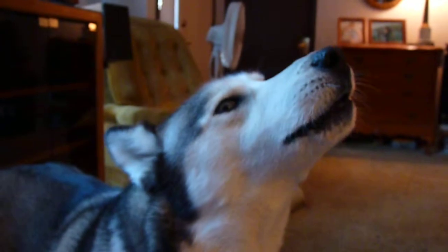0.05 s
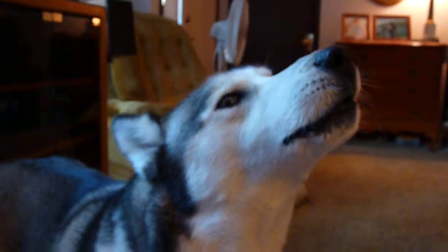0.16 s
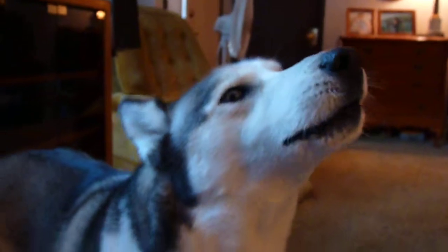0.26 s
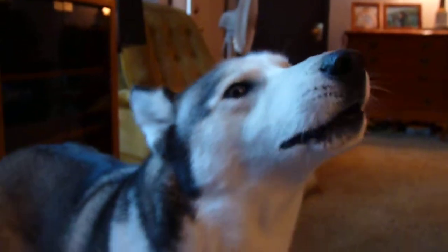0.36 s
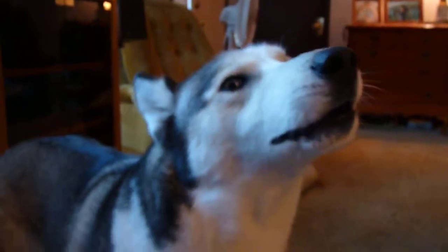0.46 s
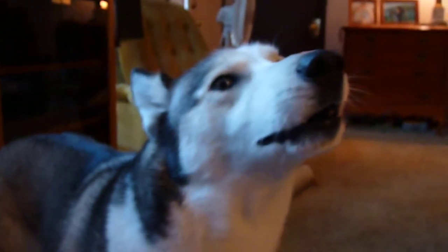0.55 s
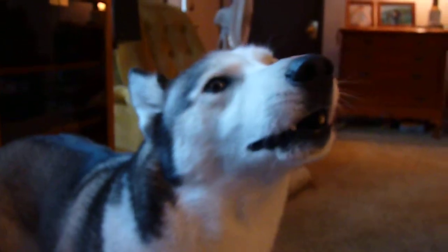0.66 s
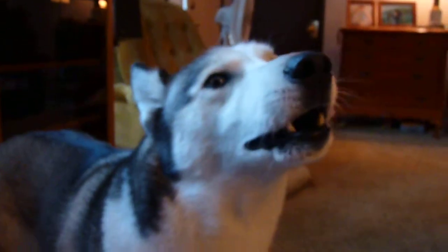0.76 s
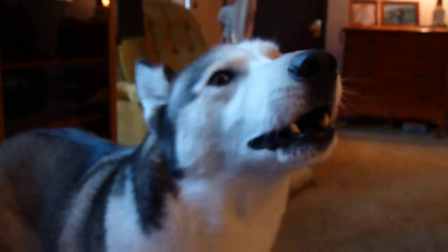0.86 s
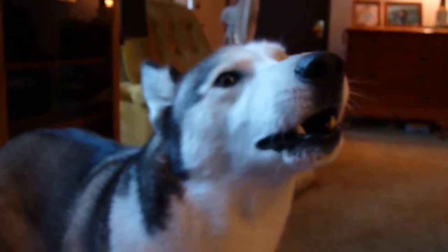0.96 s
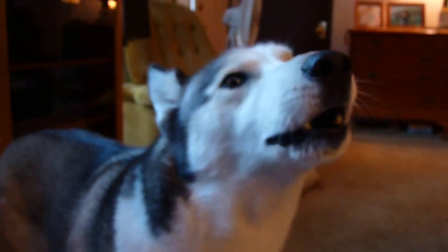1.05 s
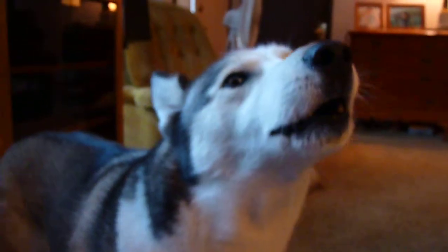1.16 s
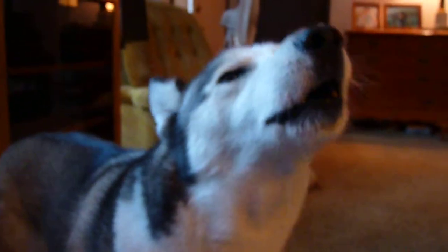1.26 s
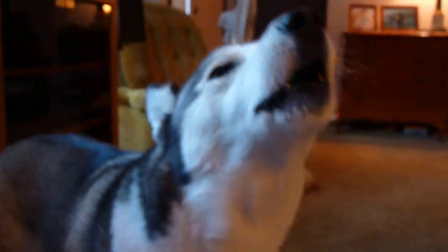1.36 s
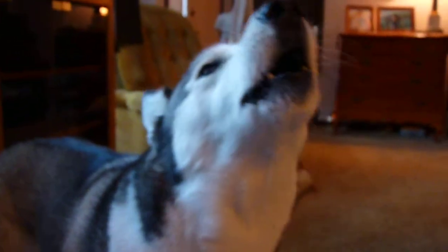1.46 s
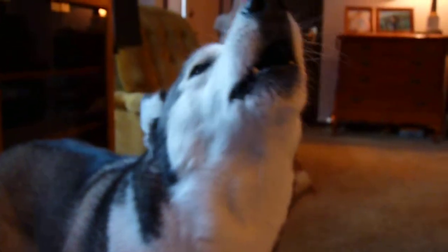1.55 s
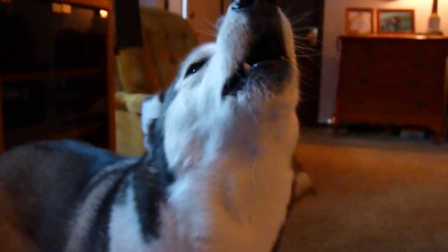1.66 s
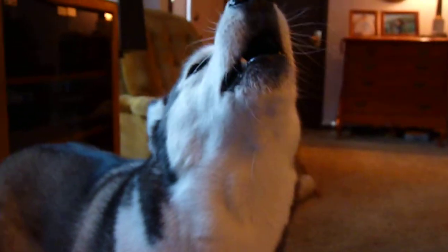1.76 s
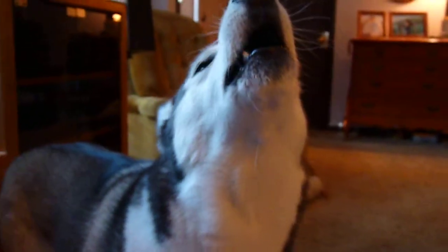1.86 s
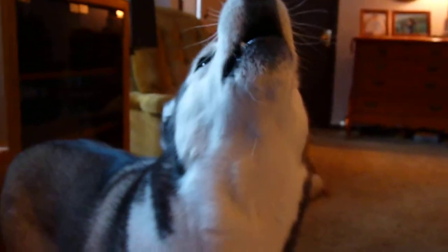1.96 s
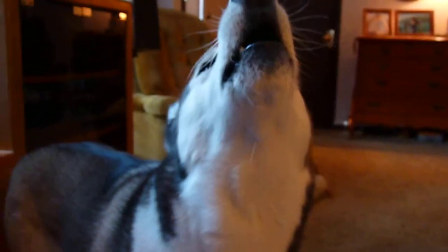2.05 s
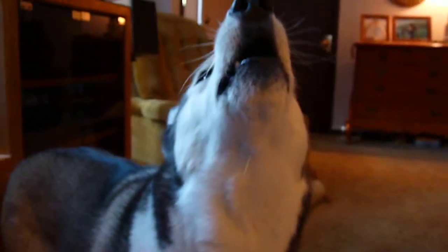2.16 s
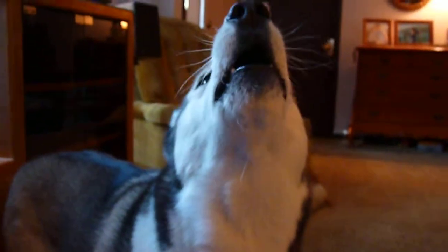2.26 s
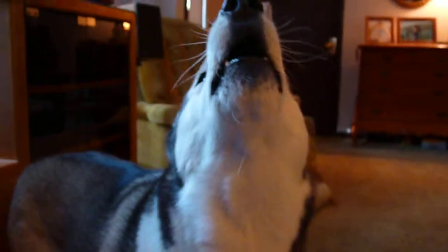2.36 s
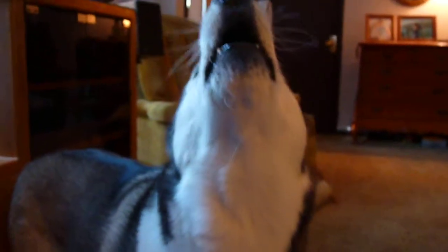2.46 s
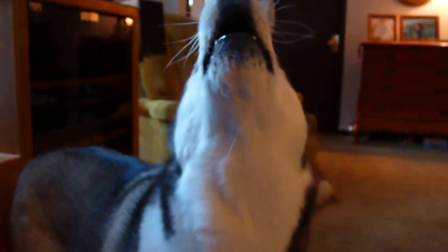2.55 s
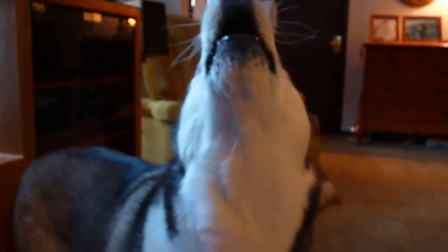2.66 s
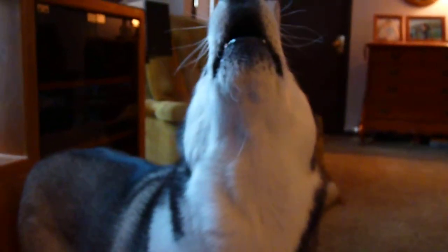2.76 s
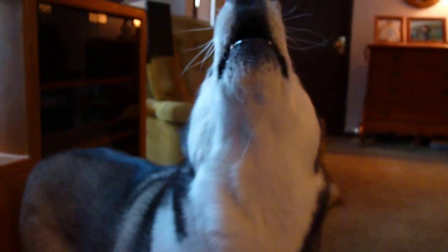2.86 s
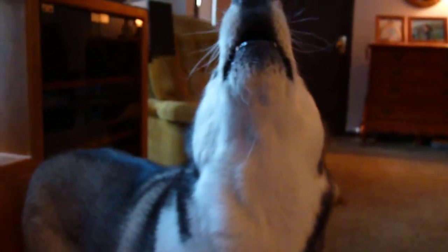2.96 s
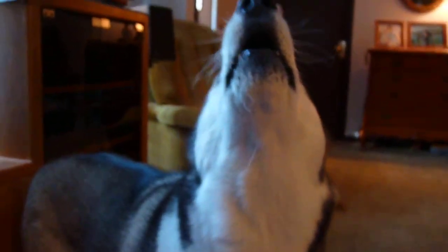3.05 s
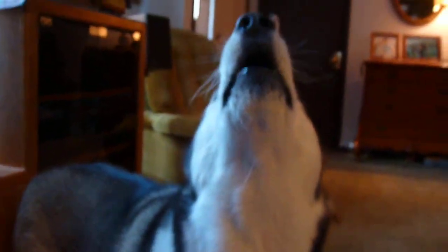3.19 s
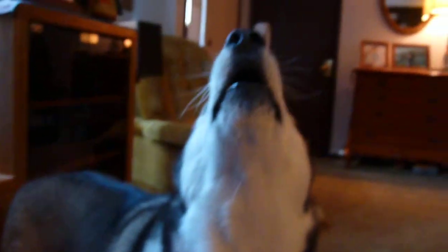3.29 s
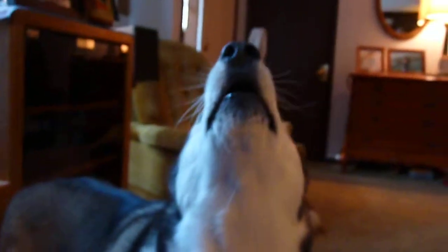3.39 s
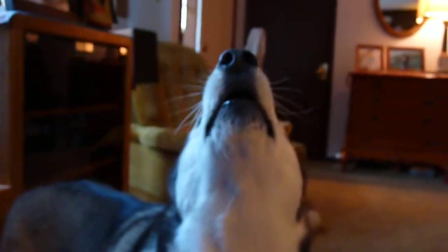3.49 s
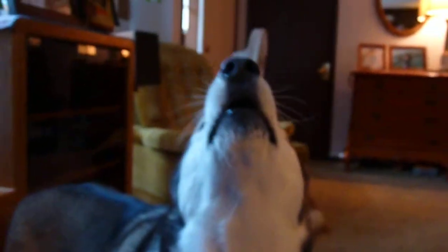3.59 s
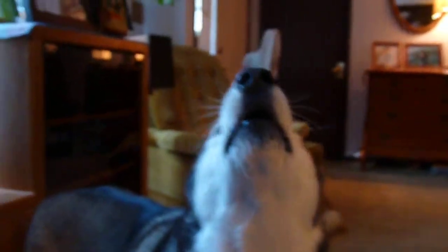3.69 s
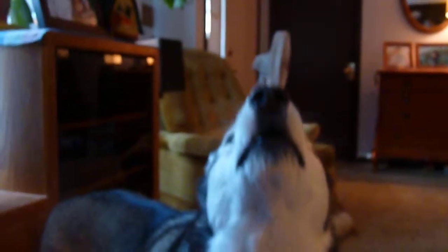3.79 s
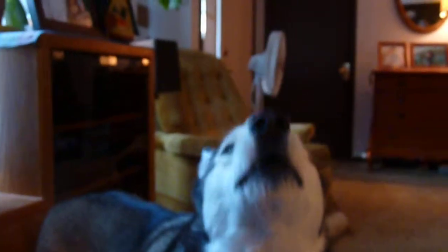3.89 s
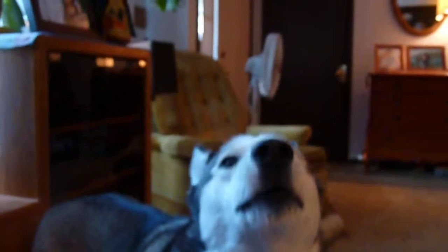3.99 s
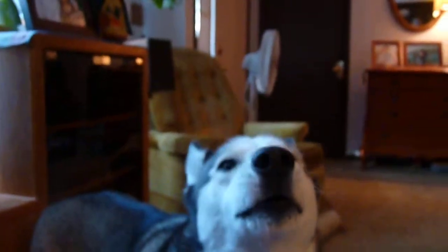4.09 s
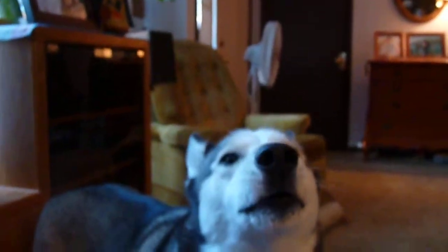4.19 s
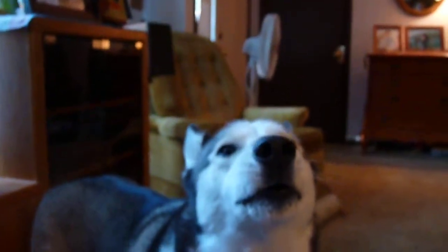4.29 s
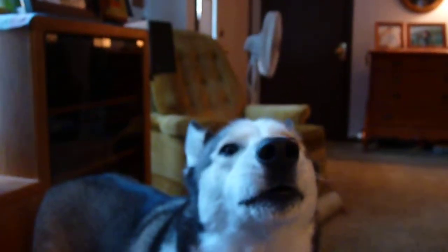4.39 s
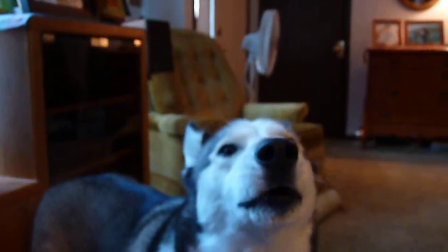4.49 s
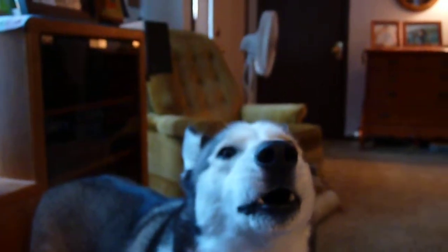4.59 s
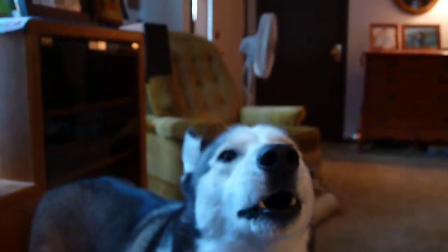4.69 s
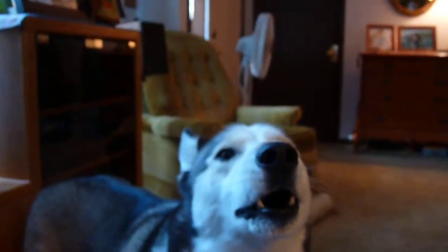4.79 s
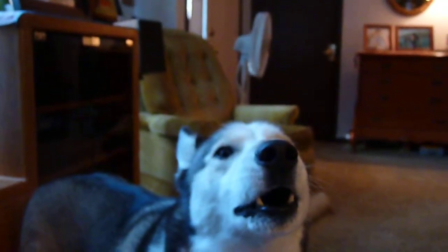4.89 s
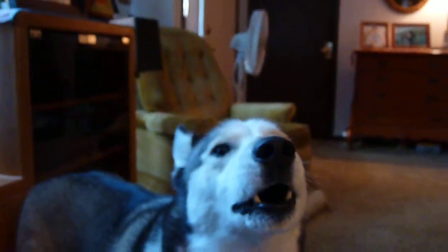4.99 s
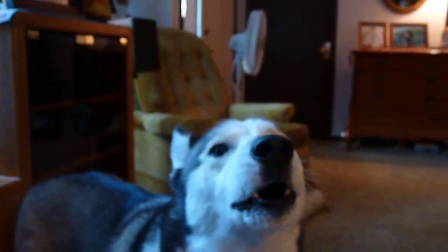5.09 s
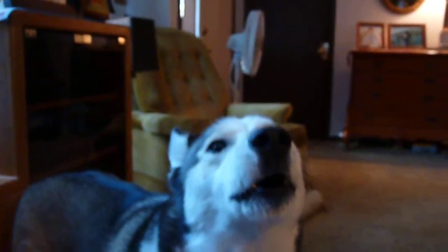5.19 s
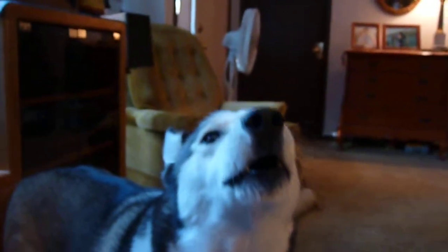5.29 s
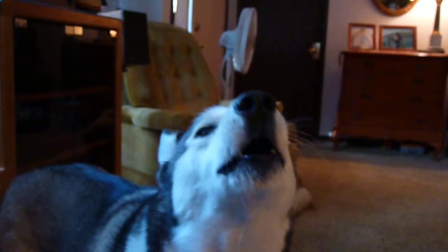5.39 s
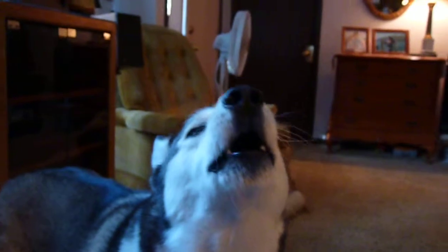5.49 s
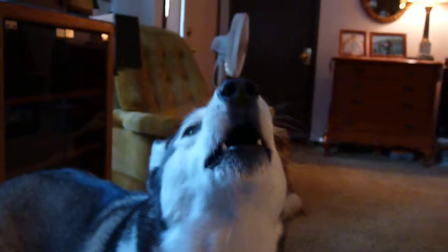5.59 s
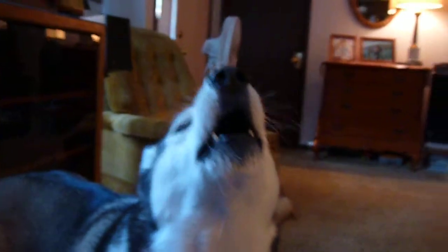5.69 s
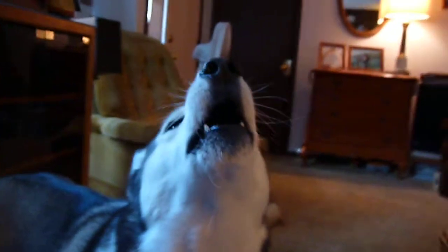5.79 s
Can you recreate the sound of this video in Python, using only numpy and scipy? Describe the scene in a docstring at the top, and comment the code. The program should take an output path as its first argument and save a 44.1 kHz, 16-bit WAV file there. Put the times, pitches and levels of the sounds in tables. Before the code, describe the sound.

A large dog close by mutters wavering syllables and holds long howls indoors, while a second dog yips and whines faintly farther off.

```python
"""A large dog close to a small camera mouths short syllables, then holds long howls, in a carpeted living room.
Its voice is summed overtones shaped by jaw, mouth and throat resonances, with breath noise pulsing each cycle.
A second dog, further off, yips and whines in arching overtones and huffs in bursts of coloured noise.
Under them lie coloured room and microphone noise, a low rumble, a faint steady tone and puffs of air."""
import sys
import numpy as np
from scipy import signal
from scipy.fft import rfft, irfft, next_fast_len
from scipy.io import wavfile
from scipy.ndimage import uniform_filter1d, map_coordinates

SR = 44100
rng = np.random.default_rng(int(sys.argv[2]) if len(sys.argv) > 2 else 0)


def persist_wave(psi):
    """Save psi, clipped to +-1, as 16-bit WAV."""
    counts = np.round(np.clip(psi, -1, 1) * 32767).astype(np.int16)
    wavfile.write(sys.argv[1], SR, np.atleast_2d(counts).T)


def ratio(d):
    """dB to gain"""
    e = np.asarray(d, float) / 20
    return 10 ** e


N = 257544
TIME = np.arange(N) / SR


def unit(x):
    """Scale to rms 1."""
    return x / np.sqrt(np.mean(x ** 2) + 1e-20)


def along(points, hz):
    """Read (frequency [Hz], value) points on a log frequency axis."""
    f, v = np.transpose(points)
    return np.interp(np.log(hz + 1), np.log(f + 1), v)


def curve(rows):
    """Read a (time [s], value) table at every sample."""
    return np.interp(TIME, *np.transpose(rows))


def wobble(knots_per_s):
    """Smooth random curve through normally distributed knots."""
    knots = rng.standard_normal(int(N * knots_per_s / SR) + 4)
    return map_coordinates(knots, [np.arange(N) * knots_per_s / SR])


def noise(spectrum):
    """Noise of rms 1, coloured by (frequency [Hz], relative level [dB]) points."""
    m = next_fast_len(N + 8192)
    white = rfft(rng.standard_normal(m))
    colour = ratio(along(spectrum, np.fft.rfftfreq(m, 1 / SR)))
    return unit(irfft(white * colour, m)[:N])


def bursts(rows):
    """Summed envelopes of (time [s], length [s], level [dB]) that rise fast and die away."""
    total = 0
    for start_s, length_s, db in rows:
        age = np.maximum(TIME - start_s, 0) / length_s
        total = total + ratio(db) * np.tanh(25 * age) * np.exp(-3 * age * age)
    return total


def dips(rows):
    """Summed bell curves of (time [s], half-length [s], depth)."""
    return sum(depth * np.exp(-((TIME - s) / half_s) ** 2) for s, half_s, depth in rows)


def hump(hz, centre_hz, width_hz, steep):
    """Gain of a resonance, 1 at its centre."""
    return (1 + ((hz - centre_hz) / width_hz) ** 2) ** -steep


def phrase(rows, fade_s):
    """Sample span, soft edges and interpolated columns of one call."""
    s, *cols = np.transpose(rows)
    span = slice(max(round((s[0] - fade_s / 2) * SR), 0), round((s[-1] + fade_s / 2) * SR))
    t = TIME[span]
    edge = np.sin(np.pi / 2 * np.clip(np.minimum(t - t[0], t[-1] - t) / fade_s, 0, 1))
    return span, edge, [np.interp(t, s, c) for c in cols]


# room and microphone noise: (frequency [Hz], relative level [dB])
QUIET_COLOUR = [(20, -34), (60, -26.5), (120, -18), (200, -14), (240, -1), (600, -0.5), (1050, -11.5),
                (1500, -14), (2300, -17.5), (4000, -21), (7000, -21.5), (8200, -28), (9000, -54.5)]
# low rumble: (time [s], mean level [dB])
RUMBLE_LEVEL = [(0.05, -65), (0.85, -65), (1.19, -78), (3.8, -66), (4.82, -66), (5.11, -82.5), (5.8, -79)]
# breath hitting the microphone: (time [s], length [s], level [dB])
MIC_PUFFS = [(.85, 0.064, -58), (.94, 0.034, -53), (1.92, 0.047, -57), (4.8, 0.072, -57)]


def background():
    """Steady coloured noise, an uneven low rumble, a faint thin electronic tone and low puffs of air."""
    hum = ratio(-58 + 0.2 * wobble(1.9)) * noise(QUIET_COLOUR)
    whistle = ratio(-83) * np.sin(2 * np.pi * 6665 * TIME)
    puffs = bursts(MIC_PUFFS) * noise([(15, -10), (35, -11), (110, -13.5), (250, -35.5), (1000, -77.5)])
    rumble_colour = [(15, -20), (40, -16.5), (85, -12.5), (125, -2), (170, -4.5), (260, -29), (600, -81)]
    rumble = ratio(curve(RUMBLE_LEVEL) + 4.3 * wobble(8.3)) * noise(rumble_colour)
    return hum + whistle + puffs + rumble


# decay of the room: (frequency [Hz], t60 [s])
ROOM_T60 = [(200, 0.15), (1500, 0.36), (6000, 0.017)]


def room(x):
    """Short furnished-room tail: noise in which each frequency dies at its own speed."""
    hz, t, z = signal.stft(rng.standard_normal(SR // 2), SR, nperseg=256)
    t60_s = np.maximum(along(ROOM_T60, hz), .03)
    tail = signal.istft(z * ratio(-60 * t / t60_s[:, None]), SR, nperseg=256)[1]
    delayed = np.pad(x, (300, 0))  # samples
    return signal.fftconvolve(delayed, tail / np.linalg.norm(tail))[:N]


# voiceless breaths of the far dog: (time [s], length [s], centre [Hz], level [dB])
HUFF_BREATHS = [(3.611, 0.22, 1600, -55), (4.088, 0.07, 703, -63), (4.507, 0.19, 554, -69)]


def far_huffs():
    """Turbulent breath: noise bursts peaking at one frequency each."""
    out = np.zeros(N)
    for s, length_s, hz, db in HUFF_BREATHS:
        colour = [(.2 * hz, -30), (.78 * hz, -8), (hz, 0), (hz, -12), (2 * hz, -26), (9000, -60)]
        out += bursts([(s, length_s, db)]) * noise(colour)
    return out


# yips, the last trailing off in a whimper: (time [s], pitch [Hz], level before throat [dB])
YIP_CALLS = [
    [(.185, 524, -59.5), (.214, 597.5, -45), (.25, 678, -38.5), (.275, 681, -40), (.302, 673, -39.5),
     (.356, 603, -42), (.42, 557, -51.5), (.46, 454, -61.5)],
    [(.694, 526, -55.5), (.73, 593, -49.5), (.768, 607.4, -42.5), (.81, 599, -47), (.86, 583, -52),
     (.93, 563, -58)],
    [(1.81, 584, -61), (1.86, 565.3, -57.5), (1.908, 760, -37), (1.938, 801.6, -37.5),
     (1.968, 816.6, -36.5), (2.025, 759, -42.5), (2.075, 550, -58)],
    [(4.262, 560.5, -49), (4.278, 597.4, -45), (4.305, 655.5, -43), (4.33, 667.6, -45), (4.357, 652, -48.5),
     (4.372, 648, -45), (4.436, 636.8, -45.5), (4.525, 617.2, -45), (4.563, 597.6, -49.5), (4.62, 588, -49),
     (4.69, 577.7, -46.5), (4.75, 592.3, -49.5), (4.8, 587.2, -49.5), (4.88, 579, -46.5),
     (4.97, 567.4, -51), (5.051, 599, -57), (5.23, 620, -54.5), (5.391, 563, -67.5), (5.48, 603, -62),
     (5.6, 516, -73.5)],
]
# throat of the far dog: (frequency [Hz], gain [dB])
FAR_THROAT = [(900, 2.5), (1180, 12.5), (1350, 8), (1550, 0), (2000, -4), (2400, -2), (2750, 1.5),
              (3280, -3.5), (3550, -11.5), (3900, -18), (4200, -29), (6000, -31), (7500, -45.5)]
# brightness of the yips: (time [s], gain per overtone above the second [dB])
YIP_SHINE = [(.19, 0), (.3, -1), (.45, 0), (1.95, 0), (4.27, -1.5), (4.31, .6), (4.51, 0.5), (4.56, 0),
             (4.8, -1.5), (4.9, -3.5), (5.2, 0)]


def far_yips():
    """Thin high voice: a weak fundamental under throat-shaped overtones of flickering loudness."""
    out = np.zeros(N)
    waver, flicker = 1 + .002 * wobble(60), ratio(2 * wobble(45))
    shine = curve(YIP_SHINE)
    for rows in YIP_CALLS:
        span, edge, (hz, level_db) = phrase(rows, fade_s=.004)
        hz = uniform_filter1d(hz, size=SR // 50, mode="nearest")  # the pitch glides round its turns
        turn = 2 * np.pi * np.cumsum(hz * waver[span]) / SR
        squeal_db = -.14 * np.maximum(hz - 690, 0)  # odd overtones fade in the highest register
        gains_db = [squeal_db - 11.5]
        for k in range(2, 12):
            gains_db.append(along(FAR_THROAT, k * hz) + squeal_db * (k % 2) + (k - 2) * shine[span])
        for k, db in enumerate(gains_db, 1):
            level = ratio(level_db + db + 2.2 * wobble(25)[span])
            out[span] += np.sqrt(2) * edge * level * np.sin(k * turn + k)
    return out * flicker


def far_dog():
    """Voiced yips plus voiceless huffs."""
    return far_yips() + far_huffs()


# voice breaks: (time [s], build-up [s], settling [s], roughness [0-1])
VOICE_BREAKS = [(.29, .015, .04, .35), (.775, .01, .05, .6), (.93, .025, .03, .58), (1.175, .03, .02, .25),
                (3.12, .07, .08, .08), (3.95, .04, .05, .22), (4.745, .012, .075, .6),
                (4.895, .015, .09, .5), (5.15, .025, .04, .25), (5.413, .025, .02, .35)]


def break_roughness():
    """Unsteadiness of the folds, rising to and falling from each break."""
    return sum(curve([(s - build_s, 0), (s, share), (s + settle_s, 0)])
               for s, build_s, settle_s, share in VOICE_BREAKS)


# fast quaver: (time [s], pitch swing [%])
QUAVER = [(1.2, 0.12), (2.1, 0.72), (2.2, 1), (2.9, 0.55), (3.25, 0.068), (5.4, 0.083), (5.6, 0.45)]


def quaver():
    """Pitch swing in percent, cycling near 23 Hz at an uneven rate."""
    return curve(QUAVER) * np.sin(2 * np.pi * np.cumsum(23 + 2.5 * wobble(4.2)) / SR)


# brief sags of pitch as the jaw works: (time [s], half-length [s], depth [%])
PITCH_SAGS = [(0.83, 0.014, 2.8), (4.805, 0.013, 3.5), (4.849, 0.01, 2.2), (4.935, .015, 1.7),
              (5.326, 0.019, 2.8)]


def pitch_waver(rough, tremor_percent):
    """Pitch factor: quaver, jaw sags, slow waver and cycle-length scatter of rough folds."""
    sag = dips(PITCH_SAGS) / 100
    return 1 + tremor_percent / 100 - sag + .0035 * wobble(28) + .12 * rough * wobble(140)


# the voice catches for a cycle or two: (time [s], half-length [s], level change [dB])
VOICE_CATCHES = [(0.917, .007, -9.5), (4.771, 0.0042, -9), (4.807, 0.0072, -5), (5.175, 0.0086, -4)]


def shimmer(rough):
    """Level factor: cycle-size scatter, larger with rough folds, and brief catches."""
    return ratio(.4 * wobble(30) + 4 * rough * wobble(170) + dips(VOICE_CATCHES))


# upper overtones against the ring: (frequency [Hz], gain [dB])
THROAT_GAIN = [(1200, -2), (1800, -22.5), (2200, -11.5), (3050, -14), (3350, -35), (3700, -41.5),
               (5000, -47.5)]


def overtone_gains(hz, level_db, jaw_hz, mouth_db, mouth_hz, is_syllable, ring_hz, ring):
    """Gains of 16 overtones: a source spectrum filtered by jaw, nose, mouth and throat resonances."""
    f = np.arange(1, 17)[:, None] * hz
    tilt = -.36 + .054 * np.minimum(level_db + 17, 0)  # power law; steeper below -17 dB
    gain = (f / 500) ** tilt * hump(f, jaw_hz, 62, steep=.64)
    knee_hz = 1080  # above it the source falls faster
    gain *= hump(np.maximum(f, knee_hz), knee_hz, 280, steep=1.2)
    if is_syllable:
        # a nearly closed mouth sends sound through the nose and hollows this region; an open one lifts it
        gain *= ratio((mouth_db + 22.5) * hump(f, 1083, 250, steep=2.1))
    # a closed mouth hums: low-pitched fundamentals gain as it closes
    hum_share = np.clip((309 - hz) / 40, 0, 1)
    gain[0] *= ratio(-.62 * (mouth_db + 27.5) * hum_share)
    mouth_width_hz = 150 if is_syllable else 94  # the open mouth rings more broadly
    gain += ratio(mouth_db) * hump(f, mouth_hz, mouth_width_hz, steep=1.96)
    upper = f[4:]
    gain[4:] += ring * (ratio(along(THROAT_GAIN, upper)) + hump(upper, ring_hz, 150, steep=1.6))
    return gain


# mouthed syllables: (time [s], pitch [Hz], level before resonances [dB], jaw resonance [Hz],
# mouth resonance [dB over level], mouth resonance [Hz])
SYLLABLE_CALLS = [
    [(.01, 264.4, -16, 632, -32.5, 1320), (.094, 268.4, -17, 632, -31.5, 1340),
     (.188, 266.2, -18.5, 645, -34.5, 1280), (.245, 271.5, -23.5, 652, -43.5, 1330),
     (.278, 272, -29, 330, -33, 1370), (.296, 286, -28, 442, -23, 1350), (.35, 287, -52, 440, -27, 1350)],
    [(.775, 303.8, -30, 530, -13, 1280), (.801, 282.8, -20.5, 507, -24, 1310),
     (.873, 294.4, -18.5, 585, -18, 1260), (.91, 286.7, -18.5, 590, -12.5, 1210),
     (.95, 303.6, -20.5, 637, -14.5, 1270)],
    [(.953, 226.3, -25, 698, -16, 1145), (1.002, 234.7, -21, 528, -14.5, 1170),
     (1.014, 239.2, -19.5, 547, -11.5, 1660), (1.078, 252.1, -18, 512, -14, 1470),
     (1.12, 247, -18, 488, -15, 1446), (1.145, 257.4, -15, 603, -21, 1330),
     (1.178, 292, -13, 750, -24, 1400)],
    [(4.735, 266.1, -26, 452, -17, 1390), (4.769, 287.9, -16.5, 530, -21.5, 1680),
     (4.863, 294.6, -21.5, 588, -12, 1640), (4.893, 288.5, -19.5, 580, -17.5, 1645)],
    [(4.9, 250.7, -21, 590, -14, 1190), (4.947, 249.9, -19, 590, -15, 1225),
     (4.957, 251.4, -17.5, 590, -17, 1760), (4.992, 257.1, -20.5, 600, -9, 1806),
     (5.068, 269.2, -20, 567, -15.5, 1780), (5.116, 266.8, -18, 530, -19, 1600),
     (5.15, 248.9, -18.5, 500, -15.5, 1500), (5.172, 269.4, -15, 633, -24.5, 1400),
     (5.24, 279, -12, 764, -26, 1385), (5.35, 270.6, -15, 718, -28.5, 1327),
     (5.412, 283.2, -12, 776, -30.5, 1344)],
]
# held howls, lips rounded: (time [s], pitch [Hz], level before resonances [dB], jaw resonance [Hz],
# mouth resonance [dB over level])
HOWL_CALLS = [
    [(1.18, 352.7, -13.5, 498, -22), (1.31, 348.8, -12.5, 494, -30), (1.68, 340.3, -13, 535, -25),
     (1.91, 332, -15.5, 496, -24), (1.94, 333.7, -18.5, 520, -26), (2.24, 316, -16.5, 564.5, -15),
     (2.82, 318.5, -15.5, 577, -21.5), (3.1, 329.2, -14.5, 539, -18.5), (3.17, 339.4, -18, 466, -39),
     (3.2, 338.5, -15.5, 510, -33.5), (3.53, 344.3, -15, 533, -33), (3.73, 352, -13, 528, -19.5),
     (3.8, 364.2, -21, 479, -4), (3.85, 377.4, -16.5, 514.4, -12), (3.92, 356, -30, 457, -17),
     (3.99, 362.6, -31, 406, -37), (4.048, 350.7, -50, 430, -38)],
    [(5.412, 350.6, -15.5, 520, -40.5), (5.444, 357.2, -15.5, 520, -17.5), (5.578, 348.5, -12, 536, -25.5),
     (5.62, 347.2, -13.5, 523, -26), (5.83, 342, -13.5, 557, -21.5)],
]
# ring deep in the throat: (time [s], frequency [Hz], level over voice [dB])
THROAT_RING = [(0, 2820, -47), (.3, 2770, -61), (.8, 2080, -27.5), (1, 2250, -27), (1.09, 2780, -32.5),
               (1.17, 2680, -44.5), (1.25, 2530, -35.5), (1.5, 2670, -34), (1.85, 2345, -35),
               (2.12, 2280, -40.5), (2.17, 2846, -36.5), (2.97, 2900, -40.5), (3.01, 2300, -39),
               (3.12, 2300, -39.5), (3.2, 2560, -44.5), (3.72, 2800, -52), (3.75, 2160, -48),
               (3.85, 2250, -52), (4.7, 2330, -37.5), (5.1, 2180, -24.5), (5.2, 2860, -44),
               (5.35, 2466, -45), (5.45, 2650, -34), (5.84, 2520, -34.5)]
# every second cycle weakens as the long howl dies: (time [s], length [s], level [dB])
CYCLE_HALVINGS = [(3.85, 0.18, -11), (3.935, 0.068, -9)]
# noise of a voice break: (frequency [Hz], relative level [dB])
RASP_COLOUR = [(130, -51), (200, -27.5), (450, 5), (1200, -5.5), (2400, -19.5), (3100, -22), (3600, -49.5),
               (8000, -84)]
# breath noise: (frequency [Hz], relative level [dB])
BREATH_COLOUR = [(150, -45.5), (300, -6.5), (500, 1.5), (750, 3), (1100, -15), (1500, -24.5), (2000, -35),
                 (3000, -28.5), (3500, -55), (8000, -76.5)]


def near_dog():
    """Overtones on the pitch of the folds, shaken at voice breaks, with breath noise pulsing once a cycle."""
    out, half = np.zeros(N), bursts(CYCLE_HALVINGS)
    howl_rough, syllable_rough = .015, .04  # between breaks
    rough = howl_rough + break_roughness()
    for rows in SYLLABLE_CALLS:
        rough[phrase(rows, fade_s=.012)[0]] += syllable_rough - howl_rough
    tremor_percent = quaver()
    waver, scatter = pitch_waver(rough, tremor_percent), shimmer(rough)
    rasp = noise(RASP_COLOUR)
    air = ratio(2 * wobble(12)) * noise(BREATH_COLOUR)
    ring_table = np.array(THROAT_RING)
    ring_hz, ring = curve(ring_table[:, :2]), ratio(curve(ring_table[:, ::2]))
    # each upper overtone flutters on its own; the quaver pumps them all, 2.5 dB per percent
    flutter = {k: ratio(2 * wobble(26) + 2.5 * tremor_percent) for k in range(5, 17)}

    for rows in SYLLABLE_CALLS + HOWL_CALLS:
        span, edge, (hz, level_db, jaw_hz, mouth_db, *moving) = phrase(rows, fade_s=.011)
        mouth_hz = moving[0] if moving else 1326
        turn = 2 * np.pi * np.cumsum(hz * waver[span]) / SR
        gain = overtone_gains(hz, level_db, jaw_hz, mouth_db, mouth_hz, bool(moving),
                              ring_hz[span], ring[span])
        lower = sum(g * np.cos(k * turn - .3 * k * k) for k, g in enumerate(gain[:4], 1))
        between = sum(g * np.sin((k + .5) * turn) for k, g in enumerate([1, .25, .06], 1))
        upper = sum(g * flutter[k][span] * np.sin(k * turn + 1.9 * k) for k, g in enumerate(gain[4:], 5))
        tone = lower + half[span] * gain[0] * between + upper
        effort = np.sqrt(np.sum(gain[:4] ** 2, axis=0))
        hiss = ratio(-27.5) * air[span] + ratio(-5) * rough[span] ** 1.6 * rasp[span]
        breath = effort * (1 + .18 * np.cos(turn)) * hiss
        out[span] += edge * ratio(level_db) * (np.sqrt(2) * tone * scatter[span] + breath)
    return out


def scene():
    """The near dog is nearly dry, the far one wetter."""
    near, far = near_dog(), far_dog()
    echo = room(ratio(-20) * near + ratio(-19) * far)
    return (near + far + echo + background())[None]


def roll_off(x):
    """The treble ends steeply here."""
    return signal.sosfilt(signal.butter(12, 8830, fs=SR, output="sos"), x)


def record(dry):
    """The small preamplifier rounds off the loudest peaks and adds a slight offset."""
    soft = dry / (1 + np.abs(dry / .33) ** 6) ** (1 / 6)
    finished = soft - .0013
    return roll_off(finished)


dry = scene()
out = record(dry)
persist_wave(out)
```